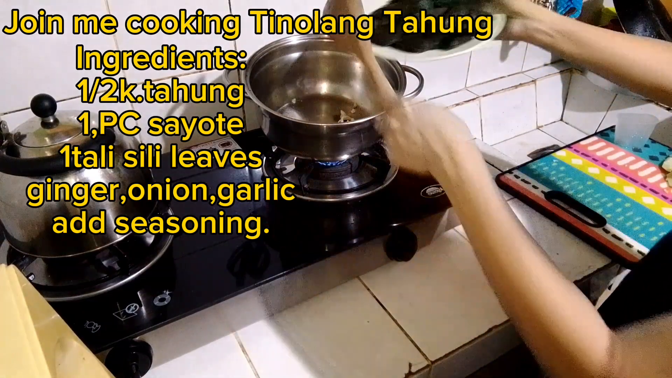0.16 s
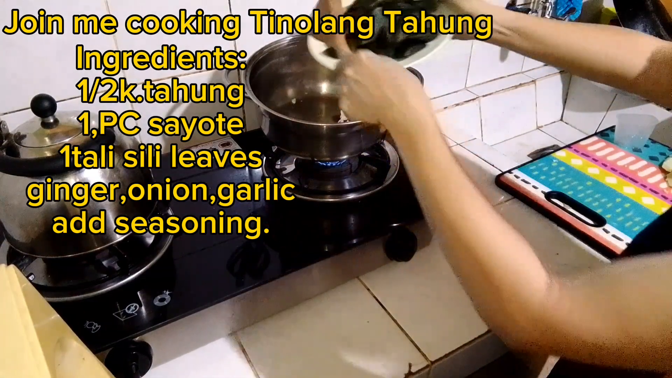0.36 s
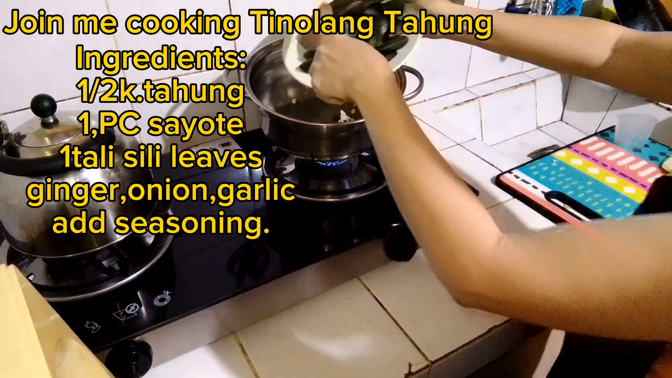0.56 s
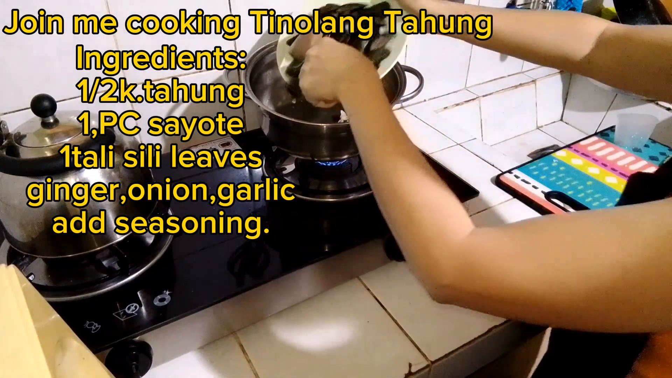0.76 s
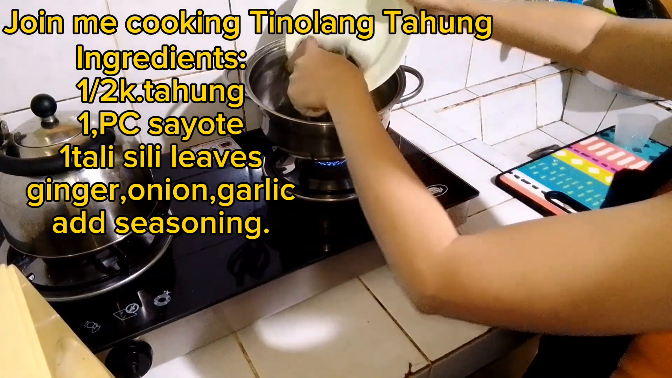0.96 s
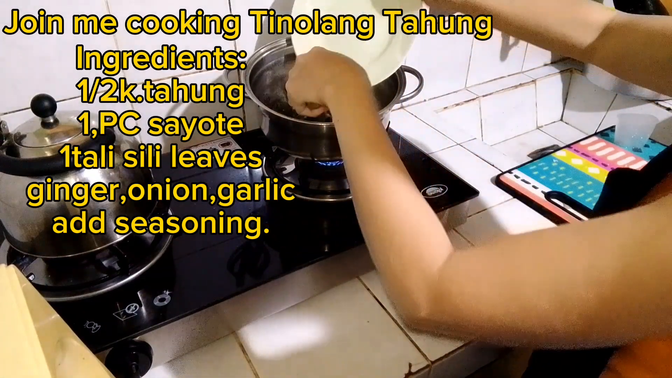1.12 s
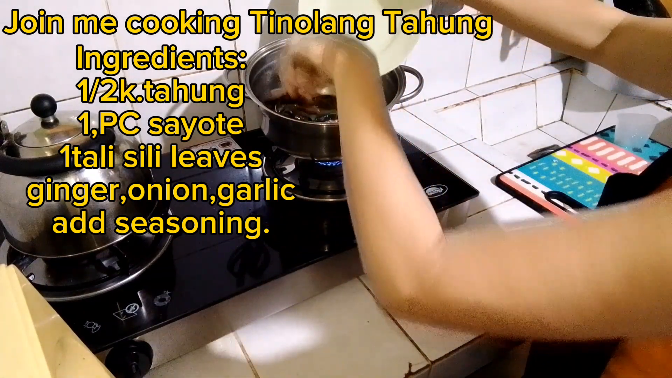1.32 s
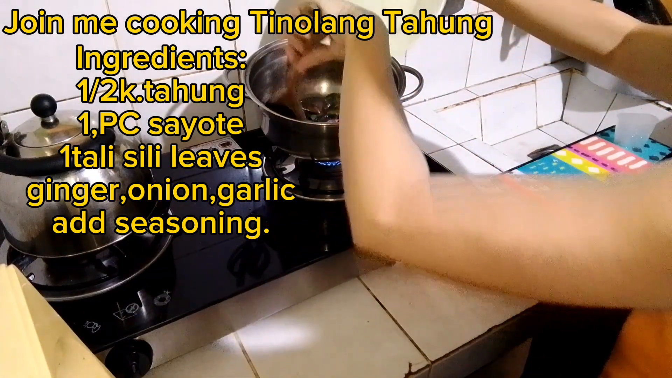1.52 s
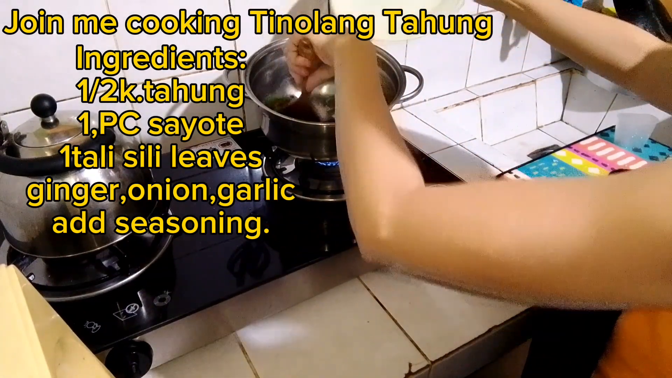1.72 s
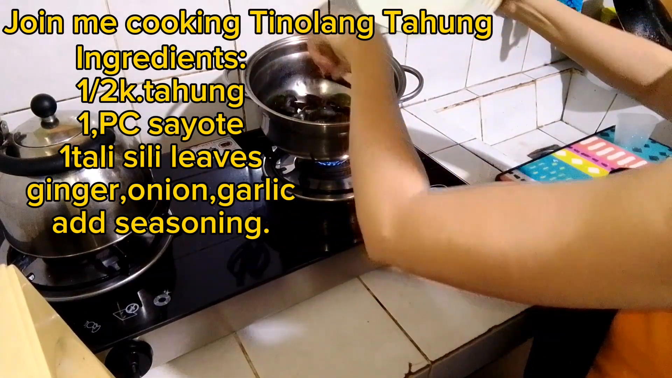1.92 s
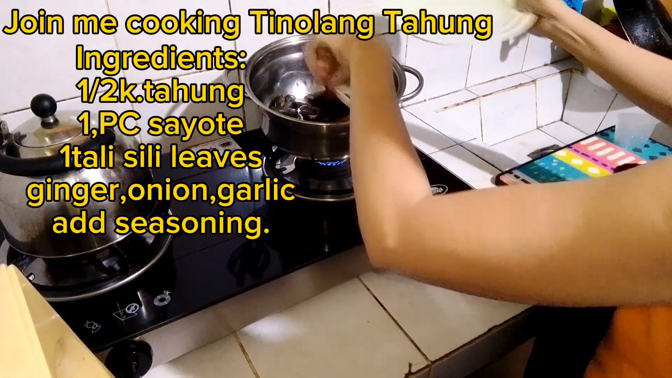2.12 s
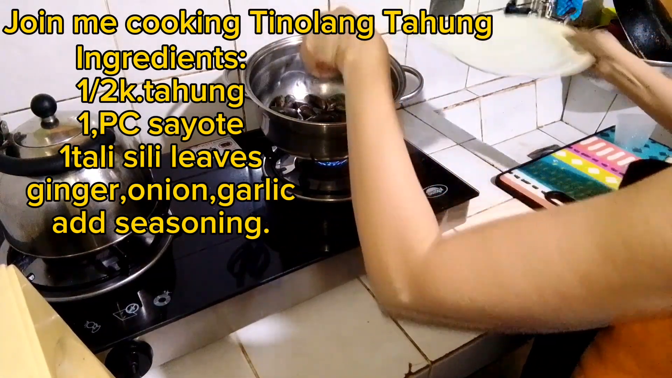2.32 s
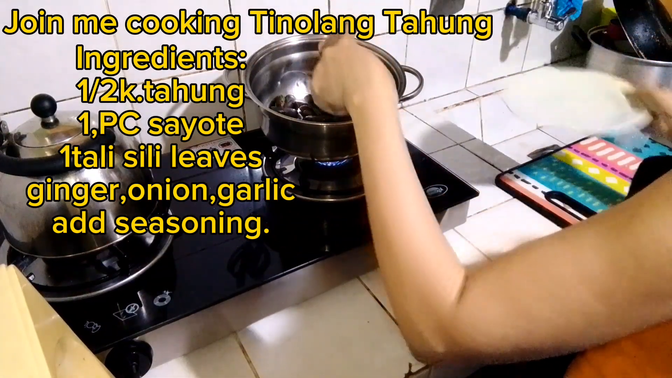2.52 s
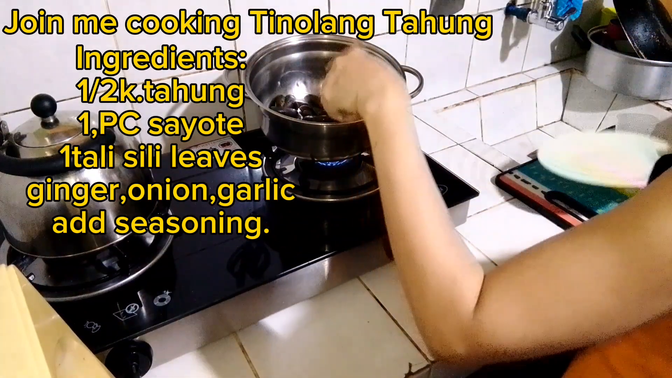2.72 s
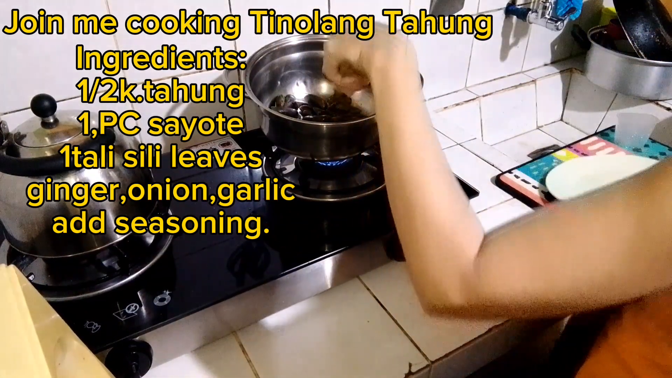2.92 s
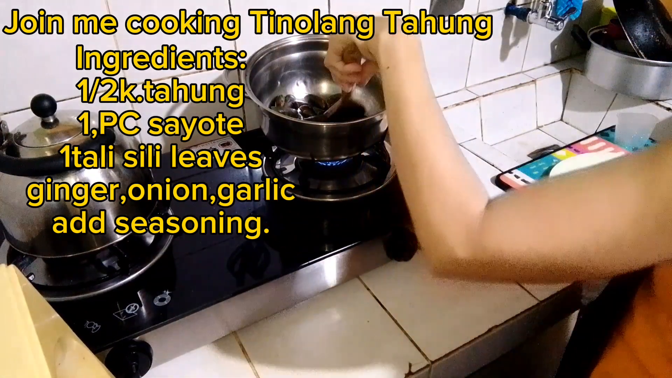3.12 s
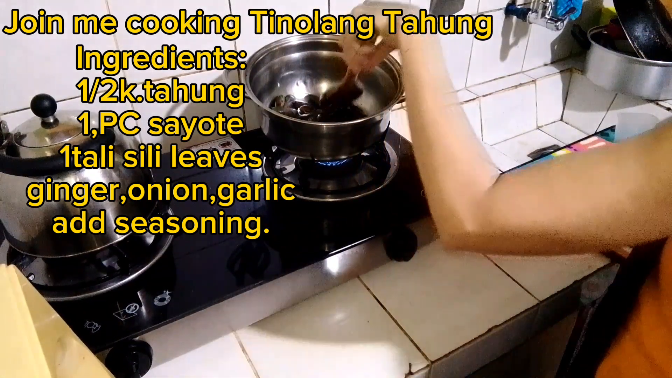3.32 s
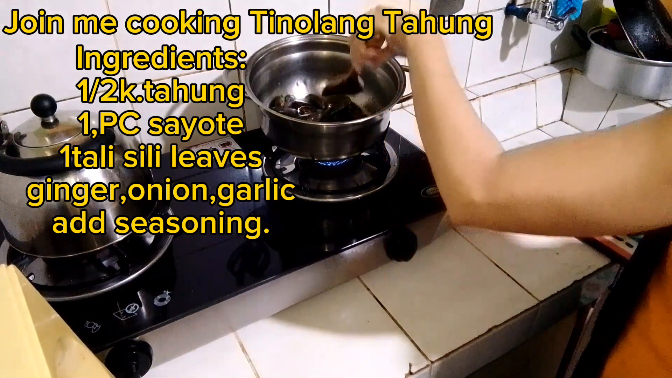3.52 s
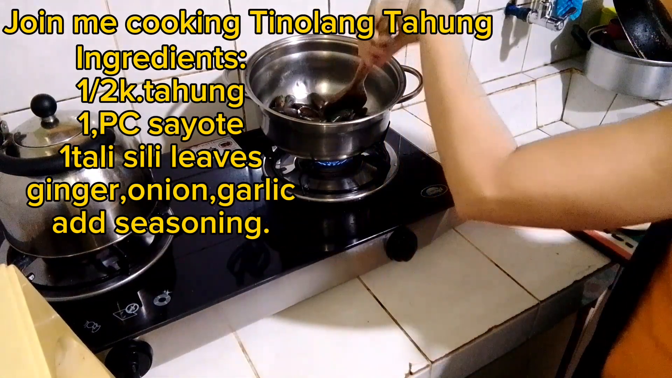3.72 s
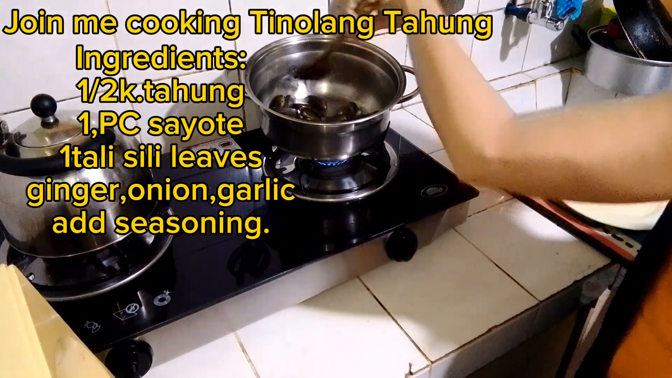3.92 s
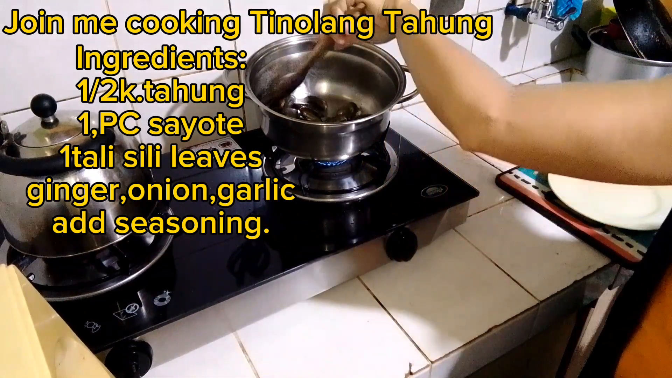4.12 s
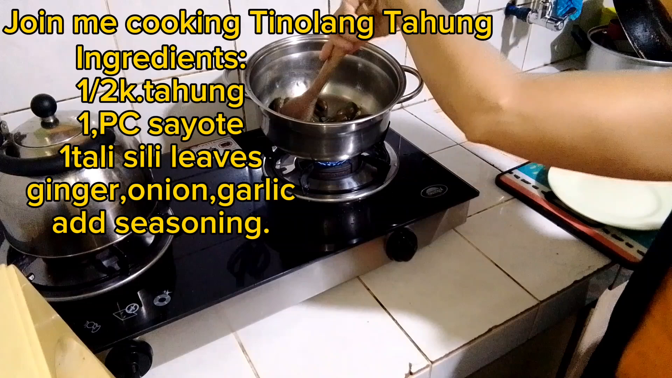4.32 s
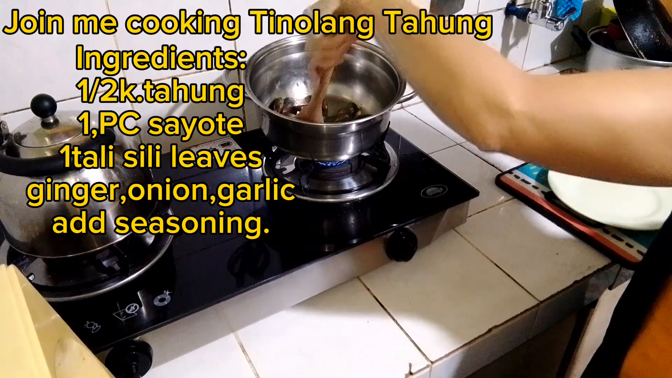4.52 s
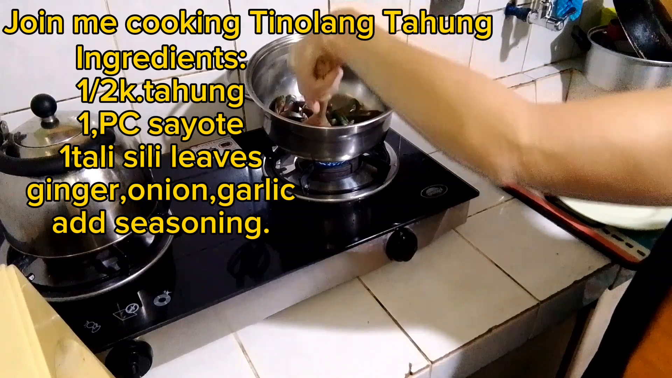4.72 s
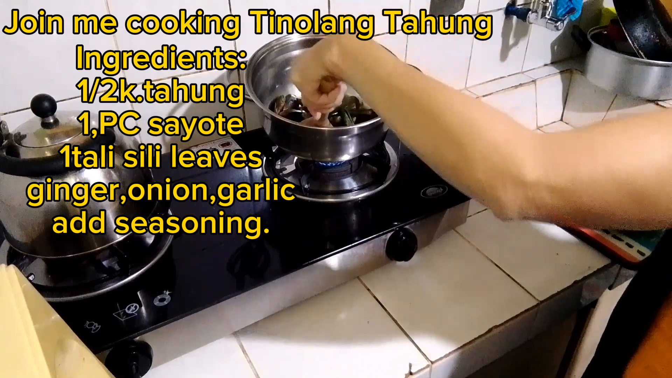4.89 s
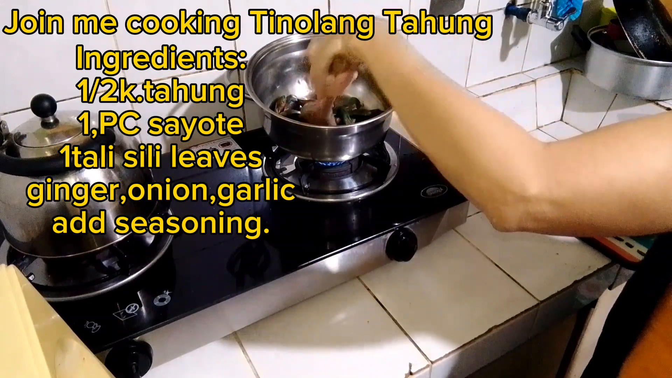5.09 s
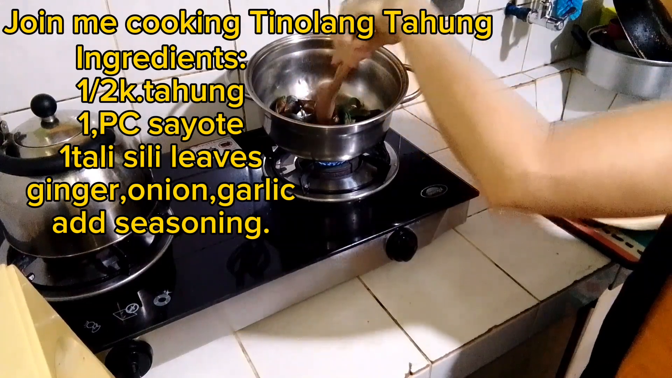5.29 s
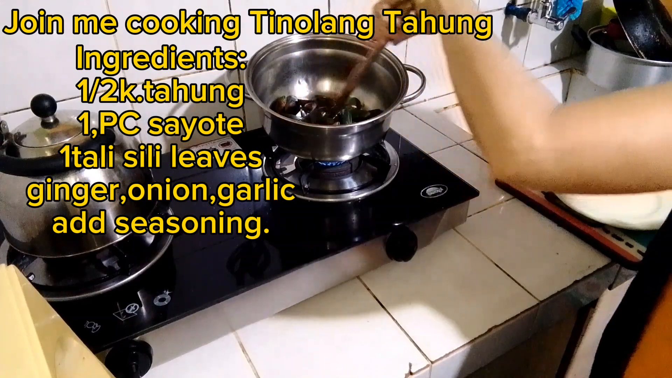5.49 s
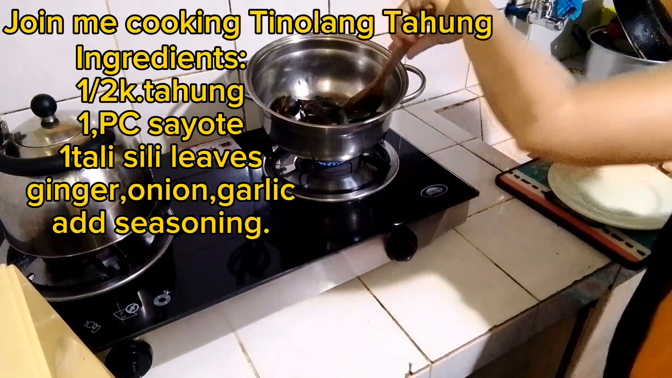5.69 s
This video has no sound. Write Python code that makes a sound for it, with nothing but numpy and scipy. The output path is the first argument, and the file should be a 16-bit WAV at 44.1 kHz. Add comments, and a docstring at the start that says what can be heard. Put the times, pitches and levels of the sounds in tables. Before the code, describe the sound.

Mussel shells clatter off a china plate into a hot steel pot, sizzling loudly, then get stirred and scraped over a gas flame.

```python
"""Mussel shells tipped from a china plate into a hot steel pot: runs of edge ticks, clacks and clinks.
Plate skids and the heap's drags are random grains sent through modes or coloured responses.
Oil sizzle (dense pops, sparse spits) flares as wet shells land; a wooden spoon knocks and judders.
Behind: gas flame noise, wavering hum, two faint whistles. Close mono microphone with peak limiting."""
import sys
import numpy as np
from scipy import signal
from scipy.fft import rfft, irfft
from scipy.io import wavfile
from scipy.ndimage import uniform_filter1d, minimum_filter1d

SR = 44100
rng = np.random.default_rng(int(sys.argv[2]) if len(sys.argv) > 2 else 0)


def generate_wav(sig):
    """Save sig (samples, or channels by samples) to the path in sys.argv[1] as 16-bit PCM at SR."""
    pcm = np.round(np.clip(np.atleast_2d(sig).T, -1, 1) * 32767).astype(np.int16)
    wavfile.write(sys.argv[1], SR, pcm)


N = 253559
TIME = np.arange(N) / SR
HIT = TIME[:SR // 2]   # time axis of one impact or response, s


def from_db(db):
    """Amplitude ratio of a level in dB."""
    return 10 ** (np.asarray(db) / 20)


def rms_one(x):
    """Scale to rms 1."""
    return x / np.sqrt(np.mean(x ** 2) + 1e-20)


def unit_energy(x):
    """Scale to a sum of squares of 1."""
    return x / np.sqrt(np.sum(x ** 2) + 1e-20)


def dying(t60_s):
    """Exponential decay by 60 dB in t60_s."""
    return np.exp(-np.log(1000) * HIT / max(t60_s, 1e-3))


def through(x, response):
    """Convolve with a response, keep the length."""
    return signal.fftconvolve(x, response)[:len(x)]


def add(out, start_s, sound):
    """Mix a sound into out at start_s."""
    start = max(round(start_s * SR), 0)
    out[start:start + len(sound)] += sound[:N - start]


def colour(spectrum, size=4096):
    """Causal (minimum-phase) response with the given spectrum, 10 dB/octave skirts, unit energy."""
    hz, db = np.transpose(spectrum)
    grid_hz = np.maximum(np.fft.rfftfreq(size, 1 / SR), 1)
    below_oct = np.maximum(np.log2(hz[0] / grid_hz), 0)
    above_oct = np.maximum(np.log2(grid_hz / hz[-1]), 0)
    level_db = np.interp(np.log(grid_hz), np.log(hz), db) - 10 * (below_oct + above_oct)
    cepstrum = irfft(np.log(from_db(level_db)))
    # fold the cepstrum onto positive time
    cepstrum[1:size // 2] *= 2
    cepstrum[size // 2 + 1:] = 0
    return unit_energy(irfft(np.exp(rfft(cepstrum))))


def drift(rate_hz):
    """Random course, linear between normal knots of spread 1."""
    knots = rng.standard_normal(4096)
    return np.interp(TIME * rate_hz, np.arange(len(knots)), knots)


def grains(per_s, spread_db, clump_db, clump_rate_hz):
    """Random clicks of uneven size and sign, in clumps; rms 1."""
    born = rng.random(N) < per_s / SR
    size_db = spread_db * np.minimum(rng.exponential(1, N), 5)
    sizes = from_db(size_db) * rng.choice([-1, 1], N)
    return rms_one(born * sizes * from_db(clump_db * drift(clump_rate_hz)))


def resonance(x, hz, t60_s):
    """Two-pole resonator: a click sets off a decaying tone at hz."""
    r, w = from_db(-60 / (t60_s * SR)), 2 * np.pi * hz / SR
    b, a = [np.sin(w) / 2, 0, -np.sin(w) / 2], [1, -2 * r * np.cos(w), r * r]
    return signal.lfilter(b, a, x + 1e-18)   # offset avoids denormals


def swell(start_s, end_s):
    """Rounded envelope of a short gesture: root of a half sine."""
    phase = np.clip((TIME - start_s) / (end_s - start_s), 0, 1)
    return np.sqrt(np.maximum(np.sin(np.pi * phase), 0))


def echoes(early_db=1.5, early_t60_s=0.064, tail_db=-12.0, tail_t60_s=0.13):
    """Path from one spot in the pot: direct sound, sparse echoes off steel and tiles, diffuse tail."""
    sparse = (rng.random(len(HIT)) < 2500 / SR) * rng.standard_normal(len(HIT)) * (HIT > .001)
    diffuse = rng.standard_normal(len(HIT)) * (HIT > .008)
    early = from_db(early_db) * unit_energy(sparse * dying(early_t60_s))
    tail = from_db(tail_db) * unit_energy(diffuse * dying(tail_t60_s))
    return unit_energy((HIT == 0) + early + tail)


def scattered(clicks, count=8):
    """Spread clicks over spots in the pot, each with its own echoes."""
    spot = rng.integers(0, count, N)
    return sum(through(clicks * (spot == k), echoes()) for k in range(count))


def pot_ring():
    """Modal response of the steel pot; a 0 dB mode has gain 1 at its own pitch."""
    # pot modes: f/Hz, level/dB, t60/s
    pot_modes = [(245, -1, .22), (280, 1, .26), (355, -5, .2), (440, -6, .25), (530, -2, .25),
                 (660, -3, .15), (719, -2, .2), (778, -2, .2), (881, 0, .25), (1070, -3, .15),
                 (1195, 1, .2), (1345, -5, .2), (1600, -5, .12), (1730, 0, .12), (2140, -5, .15),
                 (2277, -2, .15), (2802, -4, .4), (3019, -6, .4), (3235, -2, .15), (3450, -5, .15),
                 (3676, -6, .2), (4870, -9, .2), (5242, -8, .4)]
    ring = 0
    for hz, db, t60_s in pot_modes:
        unit_gain = 2 * np.log(1000) / (t60_s * SR)
        ring = ring + from_db(db) * unit_gain * dying(t60_s) * np.cos(2 * np.pi * hz * HIT)
    return ring


def on_pot(x, ring, ring_db):
    """A contact is heard directly and through the pot modes."""
    return x + from_db(ring_db) * through(x, ring)


def onset(start_s):
    """Linear rise from 0 to 1 as the shells are set in motion."""
    attack_s = 0.041
    return np.clip((TIME - start_s) / attack_s, 0, 1)


def pour(peak_db):
    """Pour gain: swells as shells gather speed on the plate, ebbs as it empties; linear in dB."""
    start_s, peak_s, rise_db_per_s, fall_db_per_s = 0.677, 1.022, 48.5, 39
    late_s = TIME - peak_s
    slope_db = np.minimum(rise_db_per_s * late_s, -fall_db_per_s * late_s)
    return onset(start_s) * from_db(peak_db + slope_db)


def shoved(part, release_t60_s):
    """Gain of one part over all shoves of the heap: quick start, sag, release; powers add."""
    # shoves: start/s, end/s, sizzle/dB, sliding shells/dB, bottom bumps/dB, wall scrape/dB
    shoves = [(0.968, 1.124, -19.5, -9.5, -19.5, -16.5), (1.153, 1.244, -19.5, -15.5, -14.5, -30),
              (1.282, 1.427, -19, -28, -22.5, -25), (1.443, 1.565, -28, -18.5, -25.5, -39),
              (1.59, 1.736, -21.5, -18, -31.5, -23), (1.761, 1.952, -16, -16.5, -26.5, -21),
              (1.976, 2.135, -19.5, -15, -26, -23.5), (2.194, 2.292, -28.5, -28, -62, -40),
              (2.346, 2.802, -24.5, -20.5, -49, -32), (2.925, 3.1, -48, -20, -51, -36),
              (3.268, 3.406, -32, -23.5, -29.5, -30), (3.404, 3.543, -21.5, -39, -59, -44),
              (3.654, 3.81, -25, -41, -23, -17.5), (3.819, 4.11, -21.5, -24.5, -48, -28.5),
              (4.128, 4.264, -33, -27, -36, -31), (4.278, 4.482, -23, -15.5, -28.5, -20.5),
              (4.478, 4.697, -24, -23, -34.5, -31), (4.848, 4.99, -24.5, -22, -39.5, -29),
              (5.05, 5.248, -22, -20, -37.5, -24), (5.24, 5.36, -18.5, -17.5, -52, -28.5),
              (5.438, 5.684, -23.5, -26, -36, -28.5)]
    sag_db_per_s = 7.5
    power, column = 0, ("sizzle", "shells", "bottom", "wall").index(part)
    for start_s, end_s, *levels_db in shoves:
        sag_db = sag_db_per_s * np.maximum(TIME - start_s, 0)
        release = np.exp(-np.log(1000) * np.maximum(TIME - end_s, 0) / release_t60_s)
        gain = onset(start_s) * from_db(levels_db[column] - sag_db) * release
        power = power + gain ** 2
    return np.sqrt(power)


def shell_clacks(per_s, shell_t60_s, count=48):
    """Tumbling shells hit each other; each rings briefly at its own pitch; rms 1."""
    hits = grains(per_s, spread_db=4.5, clump_db=2.5, clump_rate_hz=28)
    shell = rng.integers(0, count, N)
    pitches_hz = np.geomspace(2000, 6800, count) * rng.uniform(.98, 1.02, count)
    return rms_one(sum(resonance(hits * (shell == k), hz, shell_t60_s) for k, hz in enumerate(pitches_hz)))


def rustle(ring):
    """Shell edges catch in runs of ticks; hard tumbling adds clacks and rings the steel."""
    # tick spectrum: f/Hz, level/dB
    tick_spectrum = [(1200, -25.5), (2200, 0), (3200, -1), (4000, 6), (4900, 4.5), (6000, -10.5),
                     (8000, -18.5), (13000, -37)]
    level = np.hypot(pour(peak_db=-14), shoved("shells", release_t60_s=0.82))
    clicks = level * grains(per_s=2000, spread_db=3.5, clump_db=4.5, clump_rate_hz=130)
    ticks = through(scattered(clicks), colour(tick_spectrum))
    tumbling = np.sqrt(level / level.max())
    clacks = level * tumbling * shell_clacks(per_s=450, shell_t60_s=.04)
    shells = from_db(-3.5) * ticks + from_db(-9.5) * clacks
    clatter = from_db(9) * through(tumbling ** 2 * shells, ring)
    return on_pot(shells, ring, ring_db=1) + clatter


def clinks(ring, tone_db=-3.0, crack_db=-0.5):
    """A shell lands with a snap and a gritty crack and rings briefly in modes of its own."""
    # loudest clinks: t/s, level/dB, f/Hz, crack level/dB (relative)
    loud_clinks = [(0.6451, -11.5, 4390, -13), (0.841, 8.5, 3870, -38), (0.8426, -12, 5300, -31),
                   (0.8562, 12.5, 3770, -14.5), (0.866, 4.5, 4570, -26), (0.9362, 8.5, 5000, -15.5),
                   (0.9973, 12, 6370, -24), (1.0496, 9, 4860, -17), (1.1124, 12, 4830, -16),
                   (1.2308, 1, 4200, -13), (1.363, -3, 4280, -2), (1.406, -1, 4980, -5.5),
                   (1.5207, 3, 4860, -24), (1.5377, 6, 3270, -11.5), (1.6066, -2.5, 3420, -3),
                   (1.701, 4.5, 5260, -11.5), (1.9177, 4, 3930, -9), (2.0566, 7, 4330, -16),
                   (2.173, 2.5, 4460, -4), (2.2244, -9.5, 4970, -1), (2.2824, 4.5, 4870, -15),
                   (2.2888, -3.5, 4940, -29), (2.6474, -1, 3200, -13.5), (2.7527, -4.5, 4600, -4.5),
                   (2.791, 3.5, 4880, -31), (2.9482, -5, 4800, -12.5), (3.165, -4.5, 4620, -10.5),
                   (3.4037, -7, 3760, -3), (3.4825, -3, 5570, -12), (3.565, 0, 3500, -15),
                   (3.66, 1.5, 4420, -24), (3.8226, 1, 4440, -12), (3.9598, -7, 4300, 1),
                   (4.264, -9, 3860, 2.5), (4.7208, 0, 7500, -18), (4.859, -5, 7100, -9),
                   (4.979, -11.5, 4900, 0), (5.1478, 0, 3380, -5.5), (5.2217, 3, 3320, -17),
                   (5.403, -6, 3660, 0), (5.583, -2.5, 4400, -9), (5.661, 0, 2280, -11.5),
                   (5.6852, -5, 4680, -8)]
    # crack spectrum: f/Hz, level/dB
    crack_spectrum = [(800, -8), (2000, 0), (3300, 8.5), (5000, 7), (6500, 1), (9500, 4.5), (13000, -10)]
    out, crack_colour = np.zeros(N), colour(crack_spectrum)
    for start_s, db, hz, crack_rel_db in loud_clinks:
        ratios = np.append(1, rng.uniform(.65, 1.6, 9))
        strengths = np.append(1, rng.choice([-.4, .4], 9))
        modes = np.cos(2 * np.pi * hz * np.outer(ratios, HIT))
        tone = strengths @ modes * dying(.022) / 2
        grit = rng.standard_normal(len(HIT)) * dying(.016)
        snap = 7 * (HIT == 0)
        crack = through(grit + snap, crack_colour)
        clink = from_db(tone_db) * tone + from_db(crack_rel_db + crack_db) * crack
        add(out, start_s, from_db(db) * through(clink, echoes()))
    return on_pot(out, ring, ring_db=-3.0)


def plate():
    """Shells skid off the tilted plate; the skid grains excite its modes."""
    # china plate modes: f/Hz, level/dB, t60/s
    plate_modes = [(1400, -9, .012), (1950, 0, .018), (2280, -3, .04), (2700, 0, .012), (3300, -2, .025),
                   (4470, -5, .05), (5750, -7, .025)]
    skids = pour(peak_db=-21) * grains(per_s=830, spread_db=0.5, clump_db=4.0, clump_rate_hz=60)
    modes = sum(from_db(db) * dying(t60_s) * np.sin(2 * np.pi * hz * HIT) for hz, db, t60_s in plate_modes)
    return through(scattered(skids, count=4), unit_energy(modes))


def pings(rise_t60_s=0.003):
    """Falling shells ring plate and pot rim: single decaying sines with a soft onset."""
    # pings: t/s, level/dB, f/Hz, t60/s
    ping_notes = [(0.715, -25, 3300, 0.043), (0.738, -20, 4420, 0.079), (0.865, -3, 4440, 0.067),
                  (0.939, -1.5, 3166, 0.042), (0.962, -15, 2164, 0.27), (0.971, -9, 2754, 0.24),
                  (0.973, -2, 5650, 0.022), (1.031, -10, 3210, 0.18), (1.115, -16.5, 3210, .5),
                  (1.214, -19.5, 2810, 0.97), (1.346, -8, 1726, 0.052), (1.379, -12.5, 1740, 0.14)]
    out = np.zeros(N)
    for start_s, db, hz, t60_s in ping_notes:
        envelope = dying(t60_s) - dying(rise_t60_s)
        add(out, start_s, from_db(db) * np.sin(2 * np.pi * hz * HIT) * envelope)
    return out


def dragging(ring):
    """The heap bumps over the pot bottom and scrapes along its wall: coloured grains."""
    # bottom bump spectrum: f/Hz, level/dB
    bump_spectrum = [(60, -24), (130, -34), (200, -11.5), (260, -10.5), (380, -5.5), (600, 5), (880, -1),
                     (1400, -7.5), (3000, -17)]
    # wall scrape spectrum: f/Hz, level/dB
    scrape_spectrum = [(500, -29), (950, -2), (1180, 5.5), (1450, -2.5), (1800, -0.5), (2300, 1),
                       (3200, -7), (6000, -8.5)]
    bumps = shoved("bottom", release_t60_s=0.48)
    bumps = bumps * grains(per_s=780, spread_db=2.0, clump_db=1.5, clump_rate_hz=50)
    slips = shoved("wall", release_t60_s=0.8)
    slips = slips * grains(per_s=1200, spread_db=4.5, clump_db=2.5, clump_rate_hz=68)
    bottom = from_db(-6.0) * through(scattered(bumps, count=4), colour(bump_spectrum))
    wall = from_db(-6.0) * through(scattered(slips, count=4), colour(scrape_spectrum))
    return on_pot(bottom + wall, ring, ring_db=6.0)


def frying():
    """Sizzle gain: quiet oil, steady wet shells from the landing on, a flare at every shove."""
    oil_db, wet_db, landing_s = -43.5, -28.5, 0.91   # levels relative
    steady = np.hypot(from_db(oil_db), from_db(wet_db) * onset(landing_s))
    return np.hypot(steady, shoved("sizzle", release_t60_s=0.68))


def sizzle(ring):
    """Water bursts in hot oil: thousands of pops a second, and sharp spits heard directly."""
    # pop spectrum: f/Hz, level/dB
    pop_spectrum = [(300, -43), (900, -35), (1500, -17), (2400, -8.5), (3400, -1.5), (4700, 3.5),
                    (6000, -1), (8000, -1.5), (10000, -2.5), (11200, -6), (12800, -9)]
    # spit spectrum: f/Hz, level/dB
    spit_spectrum = [(1200, -15), (3000, -3), (5000, 0), (13000, 0)]
    level = frying()
    pops = level * grains(per_s=14000, spread_db=4.0, clump_db=1.68, clump_rate_hz=80)
    pops = through(scattered(pops, count=12), colour(pop_spectrum))
    spits = level * grains(per_s=45, spread_db=4.0, clump_db=1.0, clump_rate_hz=15)
    spits = from_db(-8.5) * through(spits, colour(spit_spectrum))
    return from_db(4.0) * on_pot(pops, ring, ring_db=6.0) + spits


def blow(response, t60_s, tail_db=-19.0, tail_t60_s=1.0):
    """Coloured noise burst with a slower, weaker tail; rms about 1 at its start."""
    envelope = np.hypot(dying(t60_s), from_db(tail_db) * dying(tail_t60_s))
    burst = through(rng.standard_normal(len(HIT)) * envelope, response)
    return unit_energy(burst) * np.sqrt(np.sum(envelope ** 2))


def knocks(ring):
    """Spoon and heap hit the pot: it thuds on its stand, the bottom booms, the wall raps."""
    # blows: t/s, stand thud level/dB, bottom boom level/dB, wall rap level/dB
    pot_blows = [(0.856, -48, -46, -18), (0.935, -35, -26, -30), (1.136, -52, -22, -15),
                 (1.197, -33, -23, -20), (1.344, -54, -21, -23), (1.378, -44, -23.5, -33),
                 (1.684, -32.5, -46, -30), (2.103, -37, -20.5, -21), (2.647, -61, -56, -28),
                 (2.75, -58, -58, -22.5), (2.851, -65, -57, -22.5), (2.881, -64, -52, -26),
                 (3.063, -19.5, -11, -7.5), (3.071, -21, -12.5, -27), (3.271, -28, -23, -11.5),
                 (3.303, -50, -20.5, -16), (3.673, -28, -23.5, -18.5), (3.756, -49, -52, -16),
                 (3.825, -25.5, -22.5, -30), (3.866, -49, -19.5, -16), (4.284, -35.5, -29, -12),
                 (4.505, -57, -24.5, -10.5), (4.711, -49, -34, -20.5), (4.811, -36, -39, -44),
                 (5.664, -57, -26.5, -24)]
    # stand thud spectrum: f/Hz, level/dB
    thud_spectrum = [(70, -28), (125, -3), (190, -2), (265, 10), (350, 1.5), (430, -6.5), (600, 4),
                     (1200, -59)]
    # bottom boom spectrum: f/Hz, level/dB
    boom_spectrum = [(250, -34), (430, -3.5), (540, 2), (760, 0.5), (950, -1), (1200, 2), (1700, -7.5),
                     (3500, -38)]
    # wall rap spectrum: f/Hz, level/dB
    rap_spectrum = [(700, -34), (1200, -4), (1750, 5.5), (2500, 5), (3500, 1.5), (5500, -3), (10000, -65)]
    out = np.zeros(N)
    thud, boom, rap = colour(thud_spectrum), colour(boom_spectrum), colour(rap_spectrum)
    for start_s, thud_db, boom_db, rap_db in pot_blows:
        low = from_db(thud_db) * blow(thud, t60_s=0.3) + from_db(boom_db) * blow(boom, t60_s=0.2)
        add(out, start_s, low + from_db(rap_db) * blow(rap, t60_s=0.12))
    return on_pot(out, ring, ring_db=2.5)


def spoon(ring):
    """Wood sticks and slips over the bottom: uneven slips excite a broad, hollow resonance."""
    # strokes: start/s, end/s, level/dB (relative), f/Hz
    strokes = [(4.137, 4.225, -33, 445), (4.293, 4.426, -32, 510), (4.76, 4.882, -31.5, 530),
               (5.093, 5.16, -33, 570), (5.156, 5.238, -27, 630), (5.268, 5.43, -31, 575),
               (5.527, 5.558, -34, 570)]
    slips = grains(per_s=350, spread_db=-2.0, clump_db=0.5, clump_rate_hz=32)
    sound = np.zeros(N)
    for start_s, end_s, db, hz in strokes:
        hollow = rms_one(resonance(slips, hz, t60_s=.013))
        sound += from_db(db - 2.5) * swell(start_s, end_s) * hollow
    return on_pot(through(sound, echoes()), ring, ring_db=2.0)


def hob():
    """Gas flame as coloured noise, and a hum of sines with wavering phase."""
    # flame spectrum: f/Hz, level/dB
    flame_spectrum = [(30, 8), (50, 8.5), (90, -17), (125, 1.5), (250, -0.5), (330, -8.5), (420, -8),
                      (540, -1), (700, -2.5), (950, -8), (1120, -2.5), (1500, -6.5), (3000, -18)]
    # kitchen hum: f/Hz, level/dB
    hum_tones = [(246, -64), (311, -67), (360, -59), (1065, -66)]
    flame = from_db(-49.5) * through(rng.standard_normal(N), colour(flame_spectrum))
    hum = 0
    for hz, db in hum_tones:
        phase_rad = 2 * np.pi * hz * TIME + 0.43 * drift(27)
        hum = hum + from_db(db) * np.sqrt(2) * np.sin(phase_rad)
    return flame + hum


def whistles():
    """A thin, faint tone with wavering phase comes and goes twice."""
    # whistles: start/s, end/s, level/dB, f/Hz
    whistle_tones = [(-0.03, 0.086, -50, 1156), (0.284, 0.358, -49, 1064)]
    out = np.zeros(N)
    for start_s, end_s, db, hz in whistle_tones:
        phase_rad = 2 * np.pi * hz * TIME + 0.48 * drift(50)
        out += from_db(db) * swell(start_s, end_s) * np.sqrt(2) * np.sin(phase_rad)
    return out


def scene():
    """Shells, sizzle, blows and spoon over the hob; both channels are alike."""
    ring = pot_ring()
    shells = plate() + rustle(ring) + dragging(ring) + clinks(ring) + pings()
    mono = sizzle(ring) + shells + knocks(ring) + spoon(ring) + hob() + whistles()
    return np.array([mono, mono])


def record(dry, top=0.94, low_cut_hz=95, high_cut_hz=12930, window=64):
    """The microphone thins the bass, a fast limiter holds the peaks, the top is cut."""
    low_cut = signal.butter(2, low_cut_hz, "high", fs=SR, output="sos")
    x = signal.sosfilt(low_cut, dry)
    gain = minimum_filter1d(top / np.maximum(np.abs(x), top), window)
    gain = uniform_filter1d(gain, window)
    high_cut = signal.ellip(12, .1, 70, high_cut_hz, fs=SR, output="sos")
    return signal.sosfilt(high_cut, x * gain)


dry = scene()
out = record(dry)
generate_wav(out)
```